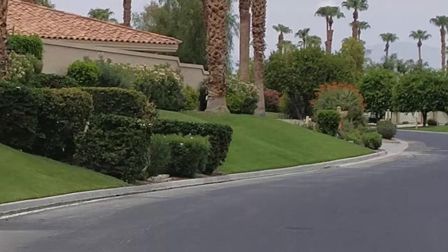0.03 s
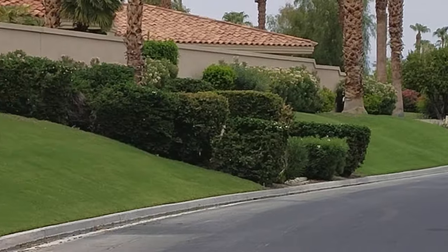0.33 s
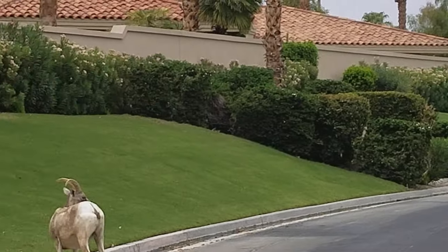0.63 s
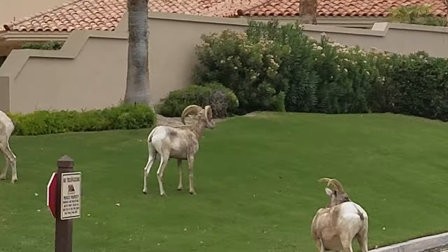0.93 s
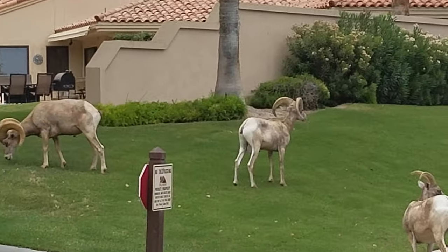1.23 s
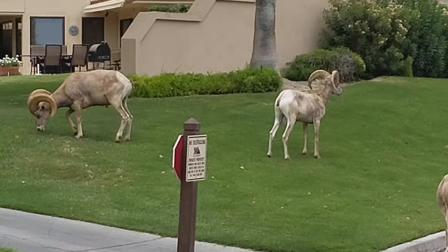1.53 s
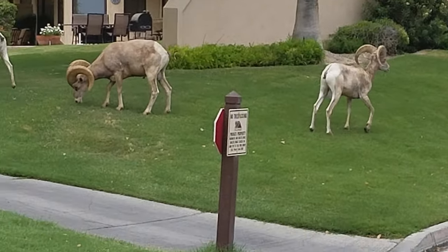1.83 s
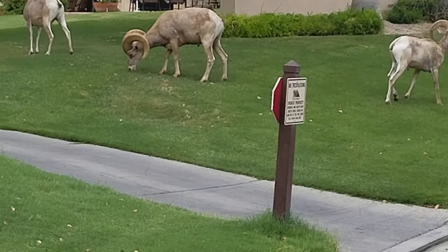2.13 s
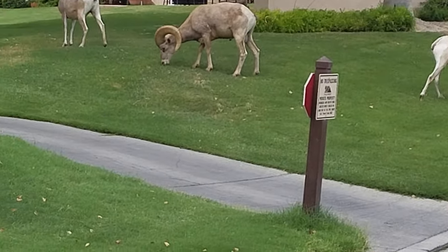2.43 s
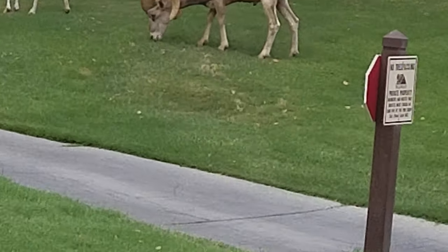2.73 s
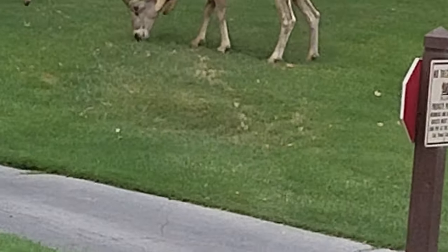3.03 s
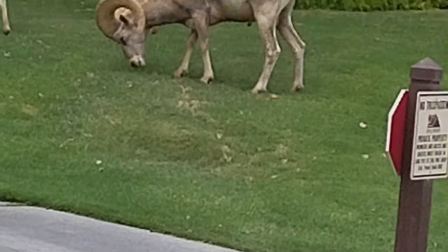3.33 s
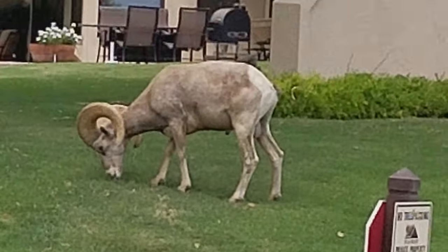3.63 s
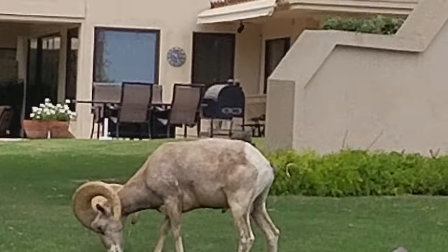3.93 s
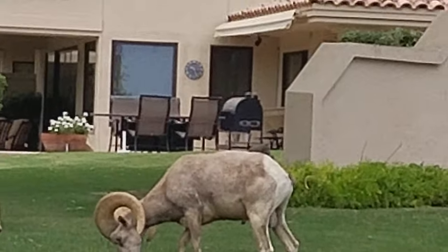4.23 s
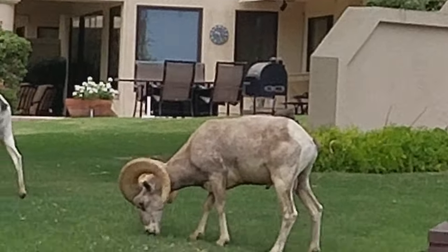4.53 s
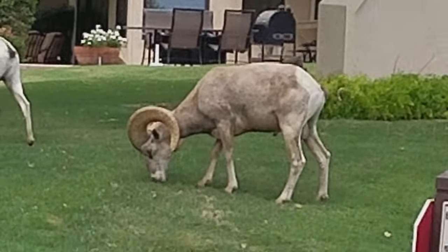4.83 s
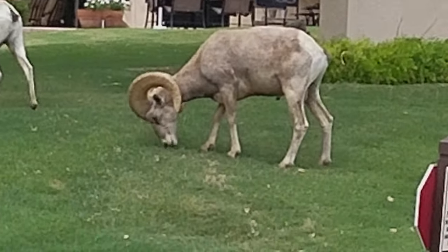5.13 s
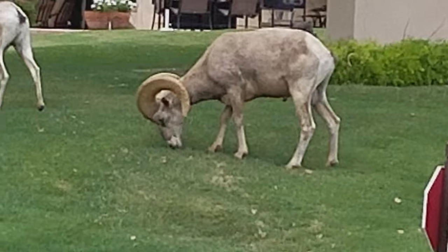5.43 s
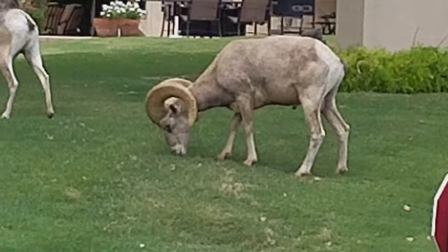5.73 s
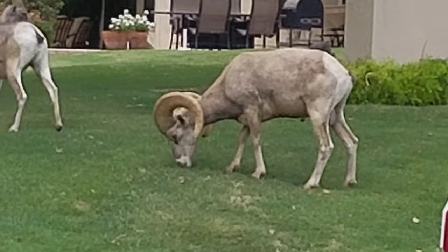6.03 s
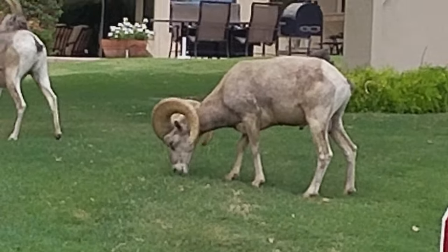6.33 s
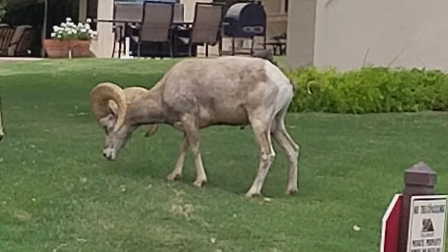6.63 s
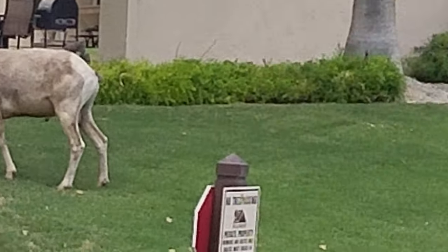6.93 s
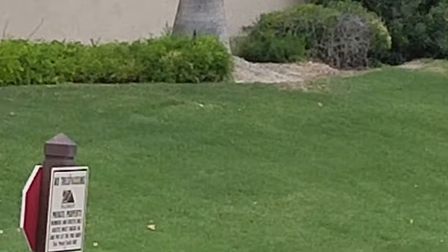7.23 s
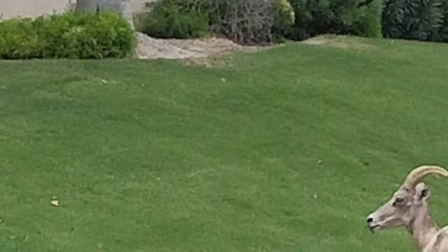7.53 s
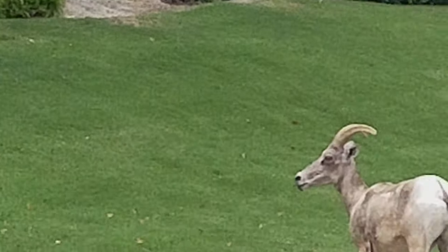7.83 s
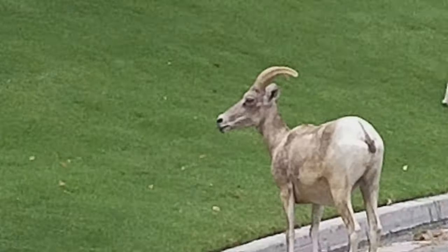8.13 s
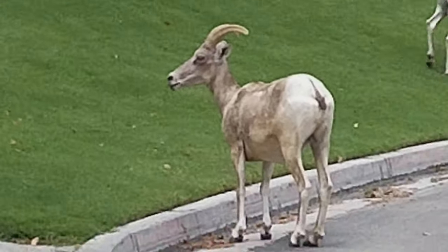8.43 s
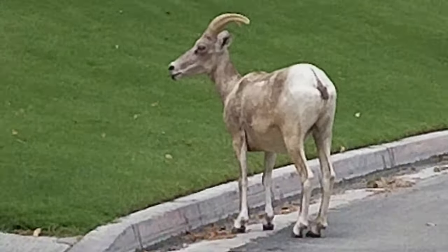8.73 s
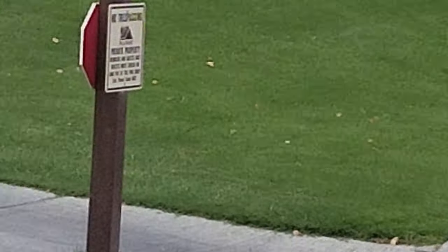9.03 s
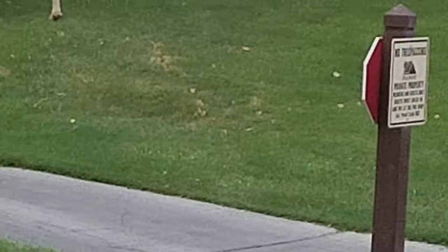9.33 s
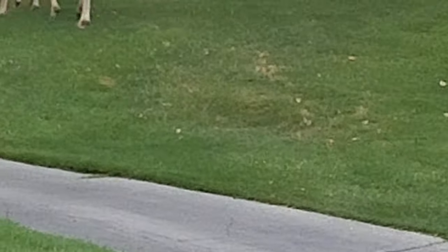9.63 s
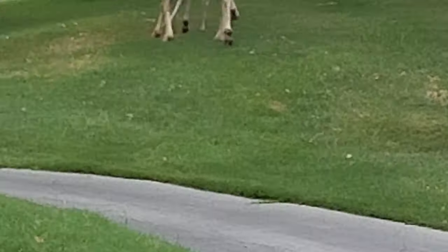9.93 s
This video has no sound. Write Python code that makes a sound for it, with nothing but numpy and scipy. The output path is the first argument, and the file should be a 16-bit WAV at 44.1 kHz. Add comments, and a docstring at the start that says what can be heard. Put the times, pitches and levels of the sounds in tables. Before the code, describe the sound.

Cicadas sizzle in a steady high hiss over the low throb of an idling car engine, with a few close handling clicks.

```python
"""Cicadas sizzle in the trees beside a quiet road, heard from a car with its engine idling.
Each insect buzzes by buckling the ribs of a tiny drum; two near ones stand out of the hissing chorus.
The engine's firings make the exhaust throb and the car body boom, over soft air and faint whines.
A finger clicks on a hand-held camera, and there are a few soft scuffs and dull bumps.
Early on, everything but these small, close noises dips for about two seconds."""
import sys
import numpy as np
from scipy import signal
from scipy.fft import rfft, irfft
from scipy.io import wavfile
from scipy.ndimage import uniform_filter1d

SR = 44100
rng = np.random.default_rng(int(sys.argv[2]) if len(sys.argv) > 2 else 0)


def store_pcm(level_fs):
    """Save levels as 16-bit WAV."""
    pcm = np.round(np.clip(level_fs, -1, 1) * 32767).astype(np.int16)
    wavfile.write(sys.argv[1], SR, np.atleast_2d(pcm).T)


N = 440118
TIME = np.arange(N) / SR

# how hard the engine sounds, against its quiet idle: t/s, exhaust throb/dB, body boom/dB
ENGINE_EFFORT = [(0, 3.5, 8), (.7, 3, 8.5), (1, 2, 7.5), (1.25, 6, 3.5), (2, 2.5, 3), (4.1, -2, -2.5),
                 (5, -2, 0), (6.3, -0.5, -1.5), (8.3, 0, -0.5), (8.65, 6.5, 6.5), (9.3, 8.5, 5.5),
                 (9.98, 6.5, 4.5)]


def gain_of(db):
    """Turn decibels into a number to multiply by."""
    return 10 ** (np.asarray(db) / 20)


def evened(x):
    """Scale a signal to an average strength (rms) of 1."""
    return x / np.sqrt(np.mean(x ** 2) + 1e-20)


def level_at(spectrum, hz):
    """Look up a spectrum's level at any frequency, joining its points on a log scale."""
    f, level = np.transpose(spectrum)
    return np.interp(np.log(hz + 1), np.log(f + 1), level)


def follow(rows):
    """Turn a table that starts with a time column into one curve for each other column."""
    times, *columns = np.transpose(rows)
    return [np.interp(TIME, times, column) for column in columns]


def drift(per_s):
    """A random wander of strength 1, with up to about per_s wiggles a second."""
    hz = np.fft.rfftfreq(N, 1 / SR)
    return evened(irfft(rfft(rng.standard_normal(N)) / (1 + (hz / per_s) ** 4), N))


def ring(hz, width_hz, size):
    """A struck resonance: the wider it is, the sooner its tone dies."""
    t = np.arange(size) / SR
    return np.exp(-np.pi * width_hz * t) * np.sin(2 * np.pi * hz * t)


def pulses(cycles, uneven_db):
    """One pulse of random size each time a cycle is completed."""
    new_cycle = np.diff(np.floor(cycles), prepend=np.floor(cycles[0])) > 0
    return new_cycle * gain_of(uneven_db * rng.standard_normal(N))


def noise(spectrum, patchy_db, size):
    """Stereo noise with the given spectrum, in which patches grow louder and softer at random."""
    # side (what sets the ears apart) against mid (what they share): f/Hz, level/dB
    side_levels = [(60, -51), (160, -48), (380, -29.5), (700, -23), (1300, -15.5), (2400, -45), (4400, -48),
                   (8000, -17.5), (15000, -18.5)]
    hz, hop = np.fft.rfftfreq(size, 1 / SR), size // 4
    draws = rng.standard_normal((5, N // hop + 5, len(hz))).transpose(0, 2, 1)
    mid_real, mid_imag, side_real, side_imag, patches = draws
    patches = uniform_filter1d(patches, size=10, axis=0)  # smooth across frequency
    patches = evened(uniform_filter1d(patches, size=10, axis=1))  # and across time
    mid = mid_real + 1j * mid_imag
    side = (side_real + 1j * side_imag) * gain_of(level_at(side_levels, hz))[:, None]
    colour = gain_of(level_at(spectrum, hz)[:, None] + patchy_db * patches)
    left_right = np.array([mid + side, mid - side]) * colour
    _, sound = signal.istft(left_right, nperseg=size, noverlap=size - hop)
    return evened(sound[:, :N])


def far_hiss():
    """A faint, even hiss far behind the insects."""
    # colour of the hiss: f/Hz, level/dB
    spectrum = [(300, 4.5), (600, 10.5), (850, -22), (1250, -2.5), (2000, 1.5), (2600, -2), (3200, -1.5),
                (3900, -6.5), (4800, -7), (7000, -9)]
    return gain_of(-19.5) * noise(spectrum, patchy_db=1.0, size=1024)


def whines():
    """Faint machine whines and one tiny squeak: thin, wavering tones that come and go."""
    # tones: start/s, end/s, first f/Hz, last f/Hz, level against the cicada chorus/dB
    tones = [(.2, 5.1, 977, 975, -26), (4.8, 8.4, 975, 974, -29), (5.9, 8.5, 944, 932, -32),
             (2.8, 4.4, 628, 620, -25), (4.5, 8, 604, 575, -27), (5.9, 8.5, 472, 466, -23.5),
             (8.5, 9.98, 520, 523, -25), (.9, 2.3, 520, 516, -23), (3.31, 3.46, 2400, 2415, -18)]
    out = np.zeros(N)
    for start, end, start_hz, end_hz, db in tones:
        hz = np.interp(TIME, [start, end], [start_hz, end_hz]) * (1 + .002 * drift(per_s=12))
        fade_s = min(.3, (end - start) / 3)
        fade = np.clip(np.minimum(TIME - start, end - TIME) / fade_s, 0, 1)
        out += fade * gain_of(db + 2 * drift(per_s=3.8)) * np.sin(2 * np.pi * np.cumsum(hz) / SR)
    return out


def air(swell_peak_s=2.34, swell_width_s=1.16, road_end_s=1.12, road_fade_s=.23):
    """A wash swells like distant tyres passing; a rush from the road fades as the camera swings away."""
    # colour of the soft wash: f/Hz, level/dB
    wash_spectrum = [(700, -7.5), (1300, -6.5), (1550, -1), (1850, 4), (2200, 0), (2600, -9), (4000, -19.5)]
    # colour of the broad rush: f/Hz, level/dB
    rush_spectrum = [(250, -2), (500, 2.5), (900, -1), (1300, 0), (1900, -13), (2600, -11), (3300, -13),
                     (4800, -30)]
    swell = gain_of(-46) / np.hypot(1, (TIME - swell_peak_s) / swell_width_s)
    road = gain_of(-48) * np.clip((road_end_s - TIME) / road_fade_s, 0, 1)
    # a little of each is always there, rising and falling with the engine
    throb_db, _ = follow(ENGINE_EFFORT)
    wash = np.hypot(swell, gain_of(-63 + throb_db)) * noise(wash_spectrum, patchy_db=1.3, size=1024)
    rush = np.hypot(road, gain_of(-58.5 + throb_db)) * noise(rush_spectrum, patchy_db=1.5, size=1024)
    return wash + rush


def scuffs():
    """Soft scuffs: short puffs of noise, each coloured by one resonance."""
    # puffs: t/s, length/s, f/Hz, width/Hz, level/dB
    puffs = [(0.792, 0.058, 845, 400, -41), (1.397, 0.093, 3120, 1200, -47), (4.918, .04, 2300, 400, -50),
             (4.926, .03, 4370, 2500, -49), (5.283, 0.023, 2000, 600, -48)]
    out = np.zeros(N)
    for start, length, hz, width, db in puffs:
        at, size = round(start * SR), round(length * SR)
        puff = signal.fftconvolve(rng.standard_normal(size + 2047), ring(hz, width, size=2048), "valid")
        out[at:at + size] += gain_of(db) * evened(puff) * np.hanning(size)
    return out


def bumps():
    """Dull, low knocks that die away quickly."""
    # knocks: t/s, level/dB
    knocks = [(2.896, -31), (3.046, -30), (8.008, -21.5)]
    out = np.zeros(N)
    for start, db in knocks:
        knock = gain_of(db) * ring(hz=94, width_hz=12, size=8192)
        out[round(start * SR):][:len(knock)] += knock
    return out


def clicks(left_db=3, floor_db=-44, size=2048):
    """A finger taps the camera's case beside the left microphone, and the case rings very briefly."""
    # resonances of the case: f/Hz, width/Hz
    case_resonances = [(340, 290), (800, 490), (1550, 590), (2300, 1260), (3400, 1300), (5350, 1500),
                       (7100, 2300), (12000, 7100)]
    # finger taps: t/s, then one level/dB for each resonance
    taps = [(1.4512, 12.5, 1, 12, -20, 14, 1, 2, -6), (1.8383, 1, 4, -0.5, -11, -32, -34, -32, -32),
            (2.3226, -12, -6, 1, 15.5, 4, 1, -18, -12), (2.4928, 7.5, 1, -5, -5, 7.5, -21, 3, -13)]
    out, hz = np.zeros(N), abs(np.fft.fftfreq(size, 1 / SR))
    peaks = np.array([np.exp(-np.log(2) * (2 * (hz - centre) / width) ** 2)
                      for centre, width in case_resonances])
    # bending waves in the case carry the treble to the microphone first
    travel = np.exp(-.2j * np.sqrt(hz))
    for start, *peak_db in taps:
        log_gain = np.log(gain_of(peak_db) @ peaks + gain_of(max(peak_db) + floor_db))
        # this sets the phase so that nothing rings before the tap
        spectrum = np.exp(np.conj(signal.hilbert(log_gain))) * travel
        click = irfft(spectrum[:size // 2 + 1])[:size // 2]
        out[round(start * SR):][:len(click)] += click
    return out * gain_of([[left_db], [-left_db]])


def dip(fall_at_s=1.417, creep_at_s=2.43, return_at_s=3.5):
    """A volume curve that sinks quickly, creeps upward, then quickly returns to full."""
    floor_db, fall_s, creep_db_per_s, return_s = -12, .31, 5.5, .23
    falling, creeping, returning = (np.maximum(TIME - s, 0) for s in (fall_at_s, creep_at_s, return_at_s))
    depth_db = floor_db * (1 - np.exp(-falling / fall_s)) + creep_db_per_s * (creeping - returning)
    return gain_of(depth_db / (1 + (returning / return_s) ** 2))


def resonate(firings, resonances):
    """Every firing strikes the same set of resonances, and their rings pile up."""
    one_strike = sum(gain_of(db) * width * ring(hz, width, size=8192) for hz, width, db in resonances)
    return evened(signal.oaconvolve(firings, one_strike)[:N])


def engine():
    """Each firing rings the exhaust and the car body, over a steady drone and a rough rumble."""
    # idling speed: t/s, firing rate/Hz
    idle = [(0, 27.3), (.5, 27.3), (.9, 26.2), (1.2, 27.4), (2, 26.8), (4.4, 27.2), (8.3, 25.7), (8.7, 27),
            (9.3, 27.4)]
    # deep resonances of the exhaust: f/Hz, width/Hz, level/dB
    exhaust = [(57.4, 11, -18), (83.1, 3.9, 1), (109.9, 9.7, 4)]
    # higher resonances of the car body: f/Hz, width/Hz, level/dB
    car_body = [(165, 10, 0), (205, 25, -16), (238, 14, -11)]
    # colour of the rumble: f/Hz, level/dB
    rumble_spectrum = [(25, -24), (45, -7), (75, 0), (125, 5), (190, 0), (250, -6), (300, -11.5),
                       (400, -14), (520, -15), (720, -17.5), (860, -23), (1200, -25), (1600, -31),
                       (3000, -57)]
    firing_hz, = follow(idle)
    throb_db, boom_db = follow(ENGINE_EFFORT)
    cycles = np.cumsum(firing_hz) / SR + .01 * drift(per_s=12)
    firings = pulses(cycles, uneven_db=2.2)
    throb = gain_of(-38 + throb_db) * resonate(firings, exhaust)
    boom = gain_of(-43.5 + boom_db) * resonate(firings, car_body)
    tones = signal.sosfilt(signal.butter(3, 45, "high", fs=SR, output="sos"), throb + boom)
    drone = gain_of(-48.3) * np.sin(2 * np.pi * cycles)
    rumble = gain_of(-38.5 + .36 * boom_db) * noise(rumble_spectrum, patchy_db=1.5, size=4096)
    return tones + drone + rumble


def far_cicadas(mid_turn_s=1.95, turn_length_s=1.1):
    """Many far insects blur into a hiss, a little brighter once the camera turns from road to lawn."""
    # colour of the chorus, facing the lawn: f/Hz, level/dB
    lawn_spectrum = [(4200, -53), (5300, -27), (6500, -12.5), (7000, -12.5), (7800, -5), (8600, -9.5),
                     (9700, -2), (10350, -1.5), (11100, 0.5), (11600, -4), (12050, -1.5), (12900, -8),
                     (14300, -16), (15800, -18)]
    # colour of the chorus, facing down the road: f/Hz, level/dB
    road_spectrum = [(4200, -26), (5300, -27), (6500, -10), (7100, -11.5), (7800, -4), (8600, -5.5),
                     (9700, 1.5), (10400, -0.5), (11500, -4), (12050, -1.5), (12900, -8), (14300, -18),
                     (15800, -17)]
    turned = np.clip(.5 + (TIME - mid_turn_s) / turn_length_s, 0, 1)
    lawn = noise(lawn_spectrum, patchy_db=.56, size=1024)
    road = gain_of(.5) * noise(road_spectrum, patchy_db=.6, size=1024)
    return np.sqrt(turned) * lawn + np.sqrt(1 - turned) * road


def near_cicada(song, ribs, jitter_cycles):
    """At each stroke of the insect's drum (its tymbal) a few ribs buckle, each with a tiny ring."""
    stroke_hz, song_db = follow(song)
    cycles = np.cumsum(stroke_hz) / SR + jitter_cycles * drift(per_s=120)
    buzz = np.zeros(N)
    for delay, hz, db in ribs:
        snaps = pulses(cycles - delay, uneven_db=1.5)
        buzz += gain_of(db) * signal.oaconvolve(snaps, ring(hz, width_hz=900, size=128))[:N]
    # the small hollow body sends out only a band of treble
    buzz = signal.sosfilt(signal.butter(4, [7200, 13000], "band", fs=SR, output="sos"), buzz)
    return gain_of(song_db) * evened(buzz)


def cicadas():
    """Two near insects buzz over the chorus, a little to the right; the first soon falls silent."""
    # each insect's song: t/s, stroke rate/Hz, level against the chorus/dB
    first_song = [(0, 147.3, -7), (1.1, 147.1, -6), (1.5, 145.4, -11), (2.1, 143, -25), (3, 143, -60)]
    second_song = [(0, 156.4, -13), (1.5, 156.8, -9.5), (3.3, 156.5, -9.5), (5.5, 156.9, -8.5),
                   (9.98, 156.5, -9.5)]
    # the ribs that buckle in one stroke: delay/cycles, f/Hz, level/dB
    first_ribs = [(0, 9680, 0), (-.01, 12050, -7), (.25, 9750, -2), (.27, 7850, -1)]
    second_ribs = [(0, 9750, 0), (.01, 7850, -8), (.17, 12050, -6)]
    # the chorus is turned down to leave room for the first insect
    _, first_db = follow(first_song)
    chorus = far_cicadas() * np.sqrt(np.clip(1 - gain_of(first_db) ** 2, 0, 1))
    first = near_cicada(first_song, first_ribs, jitter_cycles=.01)
    second = near_cicada(second_song, second_ribs, jitter_cycles=.007)
    return (chorus + second) * gain_of([[-.4], [.4]]) + first * gain_of([[-.7], [.7]])


def scene():
    """Cicadas, whines, hiss, air and engine dip together; the clicks, scuffs and bumps sit close by."""
    # the stereo sound narrows as the camera zooms in: t/s, side level/dB
    stereo_width = [(0, 10), (2.2, 10), (2.7, 1), (3.2, 0), (9.98, 0)]
    side_db, = follow(stereo_width)
    outdoors = gain_of(-32) * (cicadas() + whines() + far_hiss())
    surroundings = dip() * (outdoors + air() + engine())
    mid = surroundings.mean(0)
    side = gain_of(side_db) * (surroundings - mid)
    return mid + side + clicks() + scuffs() + bumps()


def record(dry):
    """Cut away the very highest treble."""
    low_pass = signal.firwin(511, cutoff=15850, window=("kaiser", 9), fs=SR)
    return signal.oaconvolve(dry, low_pass[None], "same")


dry = scene()
out = record(dry)
store_pcm(out)
```